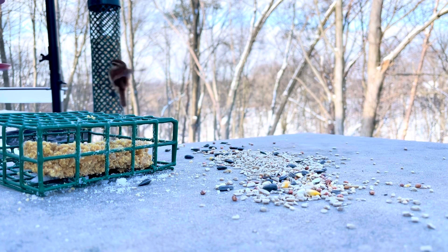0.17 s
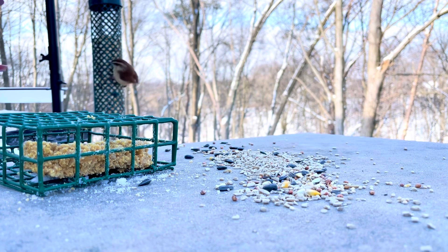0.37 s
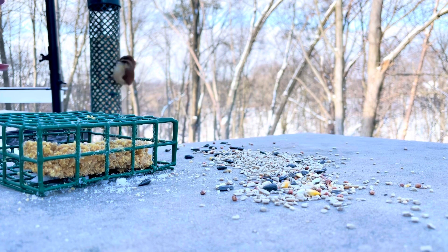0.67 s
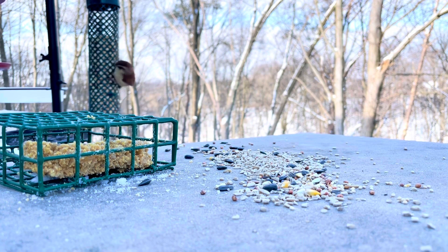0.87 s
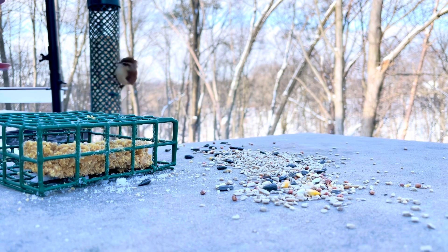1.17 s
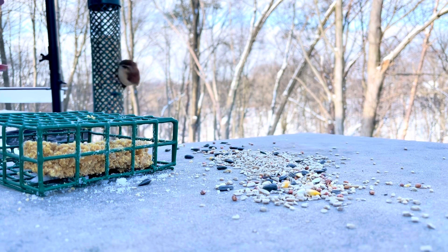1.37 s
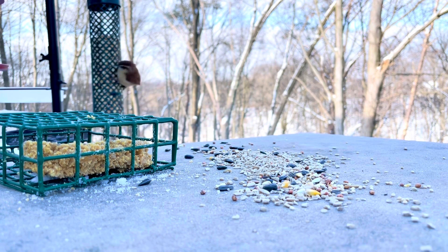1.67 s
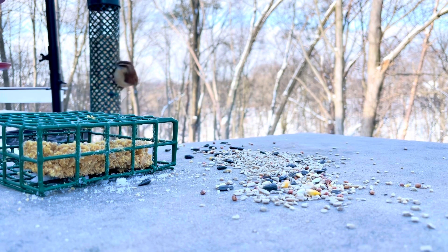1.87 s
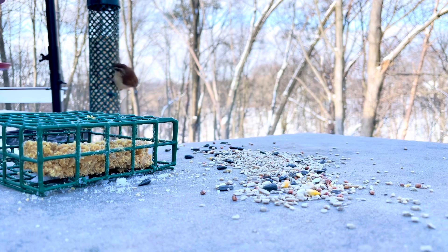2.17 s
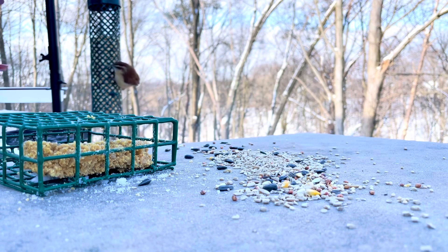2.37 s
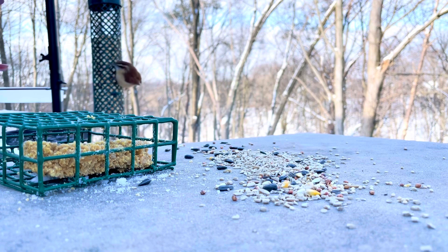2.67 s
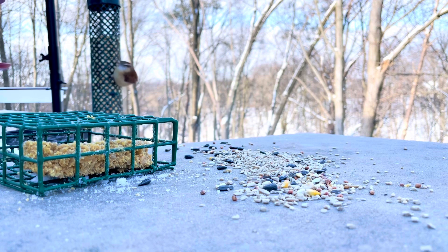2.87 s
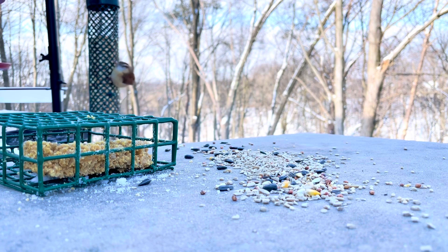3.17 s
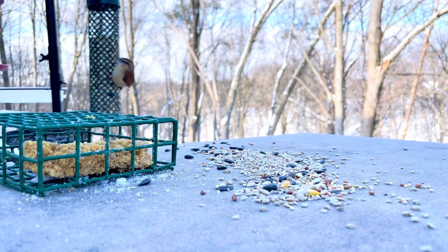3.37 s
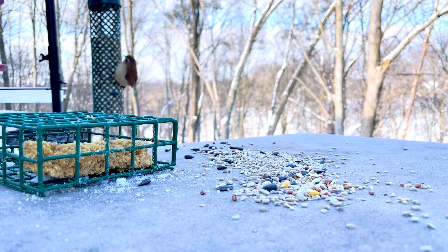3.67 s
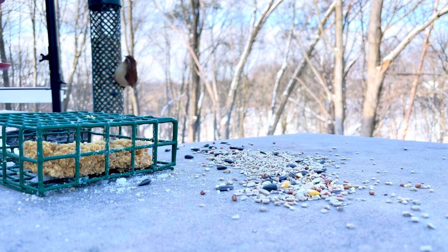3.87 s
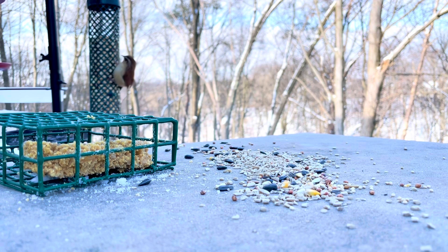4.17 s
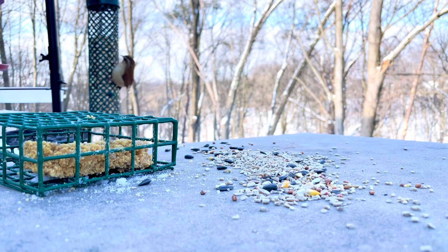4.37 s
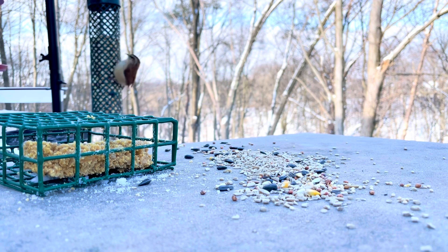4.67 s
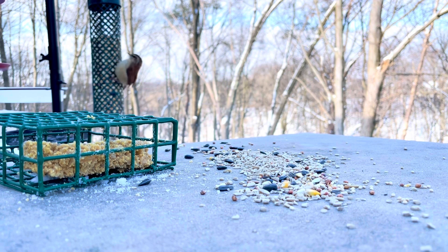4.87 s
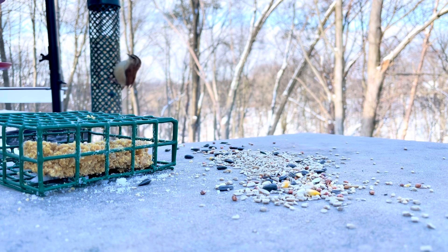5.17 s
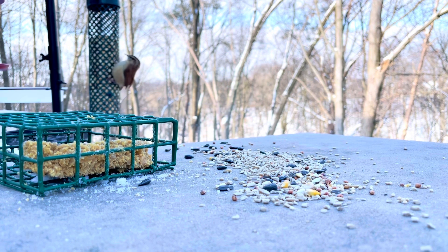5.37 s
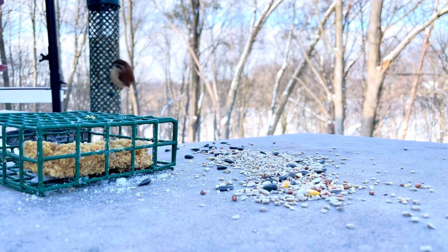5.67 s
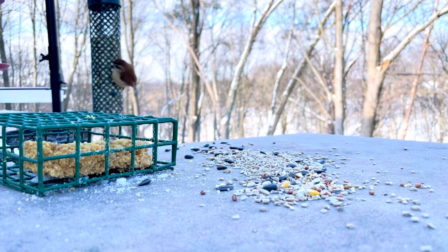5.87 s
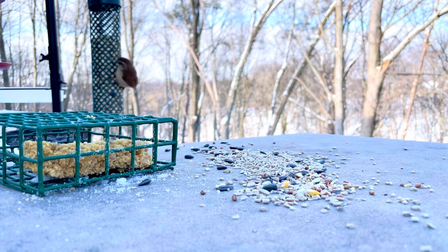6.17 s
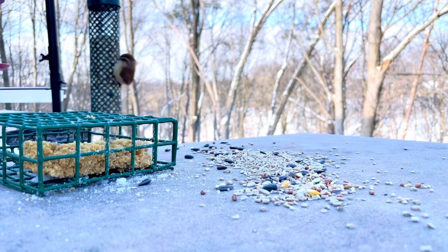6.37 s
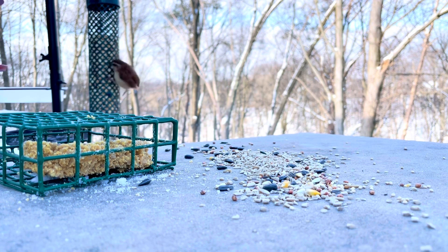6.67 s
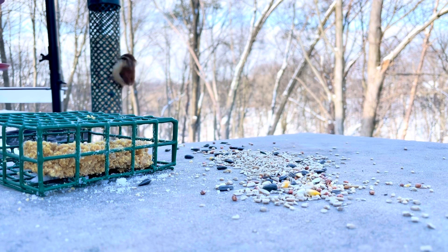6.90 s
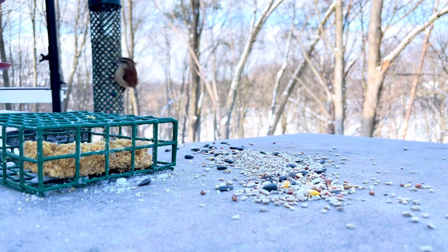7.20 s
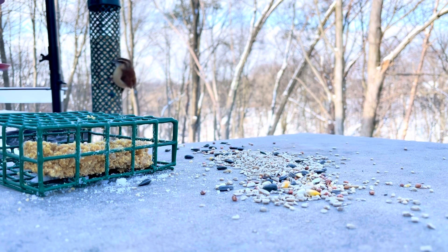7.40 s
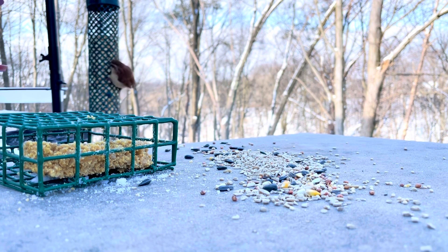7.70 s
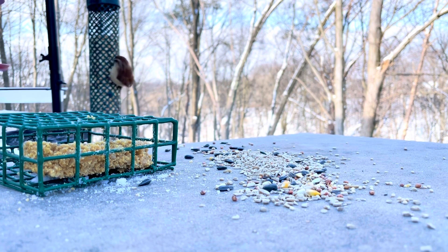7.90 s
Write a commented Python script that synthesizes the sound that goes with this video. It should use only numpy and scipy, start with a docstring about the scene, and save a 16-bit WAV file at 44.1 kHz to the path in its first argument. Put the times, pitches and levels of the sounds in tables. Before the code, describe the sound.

Crisp beak taps and light claw scratches on a metal mesh feeder outdoors, with faint bird calls and wind thudding more strongly near the end.

```python
"""A small bird lands on a wire-mesh feeder in winter woods and pecks at it: runs of tiny clicks ring tube, mesh
and wire. Claws and seeds tick on the wire in the same way, and low thumps are jolts through the feeder's mount
as it lands and settles. Other birds call from the trees: gliding sine tones, most of them with an echo of dying
noise. Gusts of wind buffet a pair of microphone ports (low noise with a moving level). Far traffic drones and
the air hisses: steady noise shaped over frequency."""
import sys
import numpy as np
from scipy import signal
from scipy.fft import rfft, irfft, next_fast_len
from scipy.io import wavfile
from scipy.ndimage import uniform_filter1d

SR = 44100
rng = np.random.default_rng(int(sys.argv[2]) if len(sys.argv) > 2 else 0)


def store_pcm(level_fs):
    """Save levels as 16-bit WAV."""
    pcm = np.round(np.clip(level_fs, -1, 1) * 32767).astype(np.int16)
    wavfile.write(sys.argv[1], SR, np.atleast_2d(pcm).T)


N = 354519  # length in samples


def amp(db):
    """Turn dB into a gain."""
    return 10 ** (np.asarray(db) / 20)


def rms_one(x):
    """Scale to an rms of 1."""
    return x / np.sqrt(np.mean(x ** 2) + 1e-30)


def at_hz(points, hz):
    """Read a table of (f/Hz, value) on a log-frequency axis."""
    p = np.array(points, float)
    return np.interp(np.log(hz + 1), np.log(p[:, 0] + 1), p[:, 1])


def through(x, response):
    """Filter by a function of frequency."""
    size = next_fast_len(N + 8192)
    spectrum = rfft(x, size) * response(np.fft.rfftfreq(size, 1 / SR))
    return irfft(spectrum, size)[..., :N]


def low_pass(x, order, hz):
    """Take away what lies above hz."""
    return signal.sosfilt(signal.butter(order, hz, fs=SR, output="sos"), x)


def high_pass(x, order, hz):
    """Take away what lies below hz."""
    return signal.sosfilt(signal.butter(order, hz, "high", fs=SR, output="sos"), x)


def delayed(x, seconds):
    """Play the same sound later."""
    return np.pad(x, (round(seconds * SR), 0))[:N]


def slow_drift(length, size):
    """Random curve of rms 1, made slow by averaging noise twice."""
    noise = rng.standard_normal(length)
    return rms_one(uniform_filter1d(uniform_filter1d(noise, size), size))


def resonance(x, hz, width_hz):
    """Ring at one pitch: a two-pole resonance with gain 1 on top; a narrow one rings longer."""
    r = np.exp(-np.pi * width_hz / SR)
    feedback = [1, -2 * r * np.cos(2 * np.pi * hz / SR), r * r]
    return signal.lfilter([(1 - r * r) / 2, 0, (r * r - 1) / 2], feedback, x)


# beak on the feeder; each part's level is its energy spread over 10 ms, before echoes and the right port's shading:
# (t/s, tube level/dB, mesh level/dB, thin wire level/dB, contact/ms,
#  then eight values level/dB: how the spot struck favours the modes near SPOT_F)
PECKS = [(0.1104, -51.5, -64, -57.5, 2.24, -9, 4, -3, -2, 5, 0, -2, 5),
         (0.813, -53, -54, -52.5, 3.6, 4, 5, -12, 6, 10, 11, -9, 2),
         (1.0425, -52, -52, -57, 1.66, 8, 5, 15, 7, 0, 12, -5, 2),
         (1.2996, -51, -52.5, -55, 3, 0, 1, 6, -5, 0.5, 7, 7, 13),
         (1.575, -50.5, -52.5, -58, 1.8, 3, -2, 3, -3, -14, 5, 4, 0),
         (3.5561, -75, -82, -88, 3.9, 0, 4, -1, 0, -4, 4, 0, 0),
         (5.602, -90, -87, -70.5, 1.7, 0, 0, 0, 2, 3, 2, -12, -26),
         (6.1526, -56.5, -57, -62, 1.9, 8, 6, 0, -4, -1, -11, 0, 9),
         (6.3984, -59.5, -53.5, -55, 3.9, 4, -2, 3, 0, -2, -3, 7, 6),
         (6.5617, -105.0, -95.0, -81, 2.5, 0, 0, -3, 2, -3, -5, -9, -18),
         (6.6597, -52, -47.5, -52.5, 1.46, 0, -7, -2, -1, -4, -12, 1, 0),
         (6.9354, -51, -54, -53, 2.42, 13, 7, -10, 8, 7.5, -1.5, 1, -6),
         (7.6787, -56, -52, -64.5, 2.9, -10, -1, 1, -1.5, 3, -10, 9, 15),
         (7.9964, -50.5, -53.5, -58, 1.93, 9, 3, -1, 10, 14, -17, -5, 2)]


def pecks():
    """The beak presses on, with one firm blow among the grains; its hold then damps tube and mesh."""
    return feeder(PECKS, grain_db=4.0, onset=0.72, fall=0.86, clump_db=1, blow_db=21, damping=1.25)


# scratches and soft ticks on the feeder, and two short echoes of pecks (0.836 s, 6.968 s); levels as for the beak:
# (t/s, tube level/dB, mesh level/dB, thin wire level/dB, contact/ms, two highest spots: level/dB, level/dB)
SCRATCHES = [(0.088, -77, -82, -80, 14, 0, -6), (0.119, -69, -71, -80, 12, 2, 4),
             (0.132, -75, -80, -80, 15, 2, 4), (0.146, -67, -72, -70, 26, 1, 8),
             (0.19, -64.5, -68, -59, 5, -9, -2), (0.2, -68, -73, -74, 19, 0, 0),
             (0.221, -71, -90, -61, 8.7, -9, 0), (0.2675, -85, -102, -50.5, 5.3, 14, 13),
             (0.3195, -82, -95, -76, 3.4, -8, -8), (0.43, -78, -79, -66, 14, -3, -10),
             (0.836, -66, -74, -85, 1.5, -9, -10), (2.074, -78, -76.5, -69, 4.5, -3, -4),
             (3.562, -95, -92, -84, 20, -10, -20), (4.022, -96.0, -86, -84, 27, -10, -20),
             (5.62, -99.0, -93, -82, 25, -10, -20), (5.873, -90, -82, -70.5, 35, -21, -22),
             (5.908, -92, -87, -80, 52, -10, -20), (5.953, -88, -83, -79, 35, -12, -20),
             (6.004, -93.0, -91, -87, 16, -12, -20), (6.624, -99, -92, -82, 14, -10, -20),
             (6.641, -98.0, -81, -91, 5.7, -10, -20), (6.968, -91, -82, -94, 1.8, -12, -22),
             (7.059, -99.0, -99.0, -82, 6, -11, -20)]


def scratches_and_ticks():
    """Claws catch more abruptly than the beak presses, and slip in clumps of about 2 ms."""
    return feeder(SCRATCHES, grain_db=6.5, onset=0.53, fall=1.0, clump_db=3, blow_db=-1, damping=0.8)


# what each part of the feeder rings with, before the spot struck and the part's level: (f/Hz, width/Hz, level/dB)
TUBE_MODES = [(1356, 410, -9), (1990, 470, -6.5), (2340, 350, -12), (2940, 760, -7.5)]
MESH_MODES = [(3790, 394, 12.5), (4000, 540, 12), (5110, 570, 8.5), (6030, 500, 7.5), (7030, 750, 7),
              (9000, 6200, -8)]
WIRE_MODES = [(10300, 3100, -8.5), (11260, 130, 2), (12660, 960, 3), (13900, 1300, -8.5),
              (15250, 1300, -19)]
# where along the spectrum the spot struck matters: (f/Hz)
SPOT_F = [2420, 2900, 3650, 5100, 6500, 9100, 13900, 15250]
BLOW_AT = .45  # when the blow click lands, as a share of the contact
RATTLE_DB, RATTLE_S = -11, 0.0042  # the wire goes on rattling after the contact
TOP_CUT_HZ = 14300  # clicks of touches with a negative last value are turned down above this
WIRE_FROM_HZ = 7500  # the thin wire radiates little below this
TOUCH_SAMPLES = 4096


def touch_clicks(u, grain_db, clump_db, blow_db):
    """Uneven tiny clicks, up or down at random, one of them set as the blow."""
    clumps = rms_one(uniform_filter1d(rng.standard_normal(TOUCH_SAMPLES), size=90))
    click_db = grain_db * rng.standard_normal(TOUCH_SAMPLES) + clump_db * clumps
    clicks = rng.choice([-1, 1], TOUCH_SAMPLES) * amp(click_db)
    clicks[np.argmax(u > BLOW_AT)] = amp(blow_db)
    return clicks


def ring(modes, push, favoured):
    """One part rings: every mode takes its share of the touch, with alternating sign."""
    rung = 0
    for k, (hz, width_hz, db) in enumerate(modes):
        mode = resonance(resonance(push, hz, width_hz), hz, 9.4 * width_hz)
        # the run of clicks gets the same energy in this mode as the plain click
        mode[0] *= np.sqrt(np.sum(mode[1] ** 2) / np.sum(mode[0] ** 2))
        rung = rung + (-1) ** k * amp(db + at_hz(favoured, hz)) * mode
    return rung


def feeder(touches, grain_db, onset, fall, clump_db, blow_db, damping):
    """Each touch is a run of tiny clicks that sets tube, mesh and wire ringing; row 2 has one plain click a touch."""
    out, t = np.zeros((2, N + TOUCH_SAMPLES)), np.arange(TOUCH_SAMPLES) / SR
    below_top = signal.butter(8, TOP_CUT_HZ, fs=SR, output="sos")
    for s, tube_db, mesh_db, wire_db, contact_ms, *spot_db in touches:
        u = t / (contact_ms / 1000 + 1e-4)  # time in contact lengths
        clicks = touch_clicks(u, grain_db, clump_db, blow_db)
        press = 2 * u ** onset * np.exp(-(2.0 * u) ** fall)
        rattle = amp(RATTLE_DB) * np.minimum(u, 1) * np.exp(-t / RATTLE_S)
        drive = np.array([clicks * (press + rattle), t == 0])
        # a negative last value also turns down the clicks above TOP_CUT_HZ
        body = signal.sosfiltfilt(below_top, drive[0])
        drive[0] = body + amp(min(spot_db[-1], 0)) * (drive[0] - body)
        # a short list of spot values belongs to the highest spots
        spots = zip(SPOT_F[::-1], spot_db[::-1])
        favoured = sorted([(1900, 0), (4300, 0), (11500, 0), *spots])
        damped = drive * np.exp(-damping * np.clip(u - BLOW_AT, 0, 1.5))
        thin = high_pass(drive, 3, WIRE_FROM_HZ)
        at = round(s * SR)
        for modes, db, push in ((TUBE_MODES, tube_db, damped), (MESH_MODES, mesh_db, damped),
                                (WIRE_MODES, wire_db, thin)):
            rung = ring(modes, push, favoured)
            energy = np.sum(rung ** 2, axis=1, keepdims=True) / (.01 * SR)
            out[:, at:at + TOUCH_SAMPLES] += amp(db) * rung / np.sqrt(energy)
    return out[:, :N]


# left minus right from the feeder's side: (f/Hz, level/dB)
FEEDER_BALANCE = [(1000, 0), (1700, 3), (2400, 7), (3100, 15), (3600, 18), (4100, 12), (5100, 4), (5800, 0),
                  (7600, 3), (9000, 1), (12000, 0)]
# how far left leads right: (f/Hz, phase/rad)
FEEDER_LEAD = [(300, 0), (1400, 1.5), (2600, 2.4), (3400, 2.3), (3800, 5.5), (4800, 6.1), (5900, 4.9),
               (6900, 5.4), (7900, 3.9), (8600, 3.1), (10300, 2), (12400, .8), (13500, .2)]


def from_the_feeder(x):
    """The feeder faces the left port; the right one is shadowed, with its own level and phase."""
    def shadow(hz):
        return amp(-at_hz(FEEDER_BALANCE, hz)) * np.exp(-1j * at_hz(FEEDER_LEAD, hz))
    return np.array([x, through(x, shadow)])


# echoes from nearby hard surfaces, as at the left port before dulling: (delay t/s, level/dB)
REFLECTIONS = [(.0107, -25), (.0218, -43), (0.032, -40), (.0563, -36)]


def reflected(x):
    """A few dull single echoes, nearer the left port."""
    late = sum(amp(db) * delayed(x, s) for s, db in REFLECTIONS)
    return low_pass(late, 4, 7600.0) * amp([[0], [-4.0]])


# how alike scattered sound is at the two ports, clipped to -1..1; opposite in phase near 9 kHz: (f/Hz, likeness)
SCATTER_LIKENESS = [(1500, 1), (3000, -0.2), (5000, 0.23), (7300, -0.24), (8200, -0.69), (9400, -1.2),
                    (10500, 1), (12500, 0.42)]


def echoes(x, t60, gap_s):
    """Scatter from many surfaces: dying noise of unit energy that swells in over a gap, partly alike at the ports."""
    t = np.arange(SR) / SR
    tail = rng.standard_normal((2, SR)) * amp(-60 * t / t60) * np.clip(t / gap_s, 0, 1) ** 2
    tail = tail / np.sqrt(np.sum(tail ** 2, axis=1, keepdims=True))
    wet = signal.fftconvolve(x[None], tail, axes=1)[:, :N]

    def share(hz):
        return np.sqrt(.5 + np.clip(at_hz(SCATTER_LIKENESS, hz), -1, 1) * [[.5], [-.5]])
    mid, side = through(wet, share)
    return np.array([mid + side, mid - side])


NEAR_ECHO_DB, NEAR_T60_S, NEAR_GAP_S = -17.5, 0.22, 0.0039


def bird_on_feeder():
    """Pecks, scratches and ticks heard directly, off hard surfaces and as scattered sound."""
    touches, plain = pecks() + scratches_and_ticks()
    plain = low_pass(plain, 8, 14000.0)  # the air dulls the scattered sound
    scattered = amp(NEAR_ECHO_DB) * echoes(plain, NEAR_T60_S, NEAR_GAP_S)
    return from_the_feeder(touches) + reflected(touches) + scattered


# low thumps as the bird lands and settles: (t/s, peak level/dB before the bass cut, f/Hz)
THUMPS = [(.005, -50, 56.3), (0.072, -46, 69.6), (0.113, -38, 95), (.18, -39, 150), (0.196, -40.5, 129),
          (.227, -40.5, 80), (.255, -42, 75), (6.153, -37, 60)]


def thumps():
    """Each is one low jolt through the mount with a dip on both sides, alike at the two ports."""
    s, db, hz = np.transpose(THUMPS)[:, :, None]
    t = np.arange(-2000, 2000) / SR
    bend = (np.pi * hz * t) ** 2
    shapes = amp(db) * (1 - 2 * bend) * np.exp(-bend)
    out = np.zeros(N + 4000)
    for at, shape in zip((s[:, 0] * SR).astype(int), shapes):
        out[at:at + 4000] += shape
    return out[2000:N + 2000]


LOUD_CALL_DB = -60  # calls softer than this lose their overtone


def call(rows, spread_hz, overtone_db, flutter_db=0):
    """A sine gliding along rows of (t/s, f/Hz, level/dB); a random wobble of pitch makes it buzz."""
    s, hz, db = np.transpose(rows)
    t = np.arange(s[0], s[-1], 1 / SR)
    wobble = rms_one(uniform_filter1d(rng.standard_normal(len(t)), size=60))
    phase = 2 * np.pi * np.cumsum(np.interp(t, s, hz) + spread_hz * wobble) / SR
    edges = np.clip(np.minimum(t - s[0], s[-1] - t) / 0.0026, 0, 1)
    flutter = amp(flutter_db * slow_drift(len(t), 500))
    level_db = np.interp(t, s, db)
    # the overtone weakens faster than the note where the call is soft
    second_db = overtone_db + min(max(db) - LOUD_CALL_DB, 0) * 10 + level_db - max(db)
    tone = np.sin(phase) + amp(second_db) * np.sin(2 * phase)
    note = np.sqrt(2) * amp(level_db) * edges * flutter * tone
    return np.pad(note, (round(s[0] * SR), N))[:N]


CHIP_START_DB, CHIP_BEND_DB, CHIP_END_DB = -16, -5, -8  # against the chip's level
CHIP_DROP_HZ, CHIP_DROP_S, CHIP_BEND_HZ, CHIP_FLICK_S = 935, 0.0055, 260, .005


def chip(s, hz, db, length, flick_hz):
    """Rows of one chip: it starts high, bends down to its pitch and ends with a falling flick."""
    return [(s, hz + CHIP_DROP_HZ, db + CHIP_START_DB),
            (s + CHIP_DROP_S, hz + CHIP_BEND_HZ, db + CHIP_BEND_DB),
            (s + 2.3 * CHIP_DROP_S, hz + 27.0, db - 1.0),
            (s + length - CHIP_FLICK_S, hz, db),
            (s + length, hz - flick_hz, db + CHIP_END_DB)]


# high chips from the trees, level before placing left and right:
# (t/s, settled f/Hz, level/dB, length/s, last falling flick f/Hz, level sent to the echo/dB)
CHIPS = [(0.711, 7350, -63.5, 0.028, 20, -16), (3.887, 7370, -68.5, 0.023, 20, -3),
         (4.346, 6970, -59.5, 0.028, 770, 0)]


def high_chips():
    """Short bright sine glides with an overtone: the dry chips, and what they send to the echo."""
    chips = np.array([call(chip(*row[:5]), 60.0, -22) for row in CHIPS])
    return chips.sum(axis=0), amp(np.array(CHIPS)[:, 5]) @ chips


WHISTLE_FADE_S, WHISTLE_EDGE_DB = 0.018, -8.5


def whistle(s, length, first_hz, last_hz, drop_hz, db, swell):
    """Rows of a glide that swells and fades; its early part may drop ahead of the even slope."""
    at = np.array([0, swell, max(length - WHISTLE_FADE_S, swell), length])
    slope_hz = first_hz + (last_hz - first_hz) * at / length
    hz = slope_hz - drop_hz * (at > 0) * (1 - at / length)
    return np.transpose([s + at, hz, db + WHISTLE_EDGE_DB * np.array([2.2, 0.19, 0.046, 0.64])])


# low whistles, most of them falling, level before edges, flutter and placing:
# (t/s, length/s, first f/Hz, last f/Hz, early drop f/Hz, level/dB, swell/s)
LOW_WHISTLES = [(.89, 0.088, 2900, 2650, 7, -90, .022), (2.776, 0.18, 2940, 2455, 289, -85, 0.063),
                (3.06, 0.07, 2390, 2470, -3, -90, 0.021), (7.812, 0.24, 2950, 2100, -110, -86.5, .025)]


def low_whistles():
    """Far, almost pure sine glides that waver in pitch (35 Hz) and level (3.5 dB)."""
    return sum(call(whistle(*row), 35, -60, 3.5) for row in LOW_WHISTLES)


# two notes of a mostly rising buzzy phrase, one list a note: (t/s into the phrase, centre f/Hz, level/dB against the note)
BUZZ_NOTES = [
    [(0, 7560, -8), (.1, 8260, -5), (.18, 8840, -6), (.23, 9530, -4), (.35, 9870, -22)],
    [(.28, 7300, -1), (.35, 7900, 2.5), (.46, 8260, -2.5), (.53, 8550, -9), (.6, 8450, -16)],
]
# when the phrase is sung, levels before flutter and placing: (t/s, first note level/dB, second note level/dB)
BUZZ_PHRASES = [(2.45, -88, -87.5), (5.17, -89.5, -91)]


def buzzy_phrases():
    """Far-off gliding sines whose fast random pitch wobble (220 Hz) is heard as a buzz."""
    total = 0
    for s, *levels_db in BUZZ_PHRASES:
        for note, db in zip(BUZZ_NOTES, levels_db):
            total = total + call(np.add(note, (s, 0, db)), 220, -60, 3)
    return total


# a short near call, level before placing: (t/s, f/Hz, level/dB)
NEAR_TICK = [(2.614, 4950, -92), (2.62, 4920, -86.5), (2.638, 4900, -95)]


def near_tick():
    """One faint wobbling sine, dry and stronger on the left."""
    return call(NEAR_TICK, 170, -60, 0) * amp([[2.0], [-2.0]])


WOODS_DB, WOODS_T60_S, WOODS_GAP_S, WOODS_CUT_HZ = 2, 0.42, 0.0047, 9200
WHISTLE_ECHO_DB = -7  # the low whistles come more directly
TRUNK_ECHO_S, TRUNK_ECHO_DB = 0.027, -14  # one near tree throws the chips back
TREES_LAG_S = .00006  # calls reach the right port first


def birds():
    """All calls from the trees, with the long, dull echo of the woods; one tick is near and dry."""
    chips, sent = high_chips()
    whistles, buzzes = low_whistles(), buzzy_phrases()
    trunk = low_pass(amp(TRUNK_ECHO_DB) * delayed(sent, TRUNK_ECHO_S), 4, WOODS_CUT_HZ)

    def lag(hz):
        return np.exp(-1j * np.pi * hz * TREES_LAG_S * np.array([[1], [-1]]))
    direct = through(chips + trunk + whistles + buzzes, lag) * amp([[1.5], [-1.5]])
    dull = low_pass(sent + amp(WHISTLE_ECHO_DB) * whistles + buzzes, 4, WOODS_CUT_HZ)
    woods = amp(WOODS_DB) * echoes(dull, WOODS_T60_S, WOODS_GAP_S)
    return direct + woods + near_tick()


WIND_LIKENESS, WIND_EVENNESS = 0.56, 0.37  # share alike at both ports; how far swings are evened out


def buffet(hz, width_hz):
    """Eddies at the ports: low noise, partly alike, with its own swings of level partly evened out."""
    both, own = rng.standard_normal(N), rng.standard_normal((2, N))
    x = np.sqrt(WIND_LIKENESS) * both + np.sqrt(1 - WIND_LIKENESS) * own
    x = resonance(resonance(x, hz, width_hz), hz, width_hz)
    level = np.sqrt(uniform_filter1d(rms_one(x) ** 2, size=1500, axis=1) + 0.019)
    return rms_one(low_pass(x, 2, 500) / level ** WIND_EVENNESS)


# gusts that hit the ports, added to the breeze:
# (t/s of arrival, lasts/s, thud level/dB, flap level/dB, left minus right level/dB)
GUSTS = [(0, 0.0086, -47, -63, -1), (0.217, 0.011, -54, -61, -5), (0.802, 0.023, -67, -56, 2),
         (3.085, 0.094, -62, -57, 5), (3.242, 0.015, -44.5, -50, -2), (3.39, 0.017, -55, -62, 1),
         (3.515, 0.033, -54.5, -63, 2), (3.623, 0.033, -49, -62, 1), (3.765, 0.017, -62, -53, -8),
         (4.83, 0.015, -60, -59, -3), (6.135, 0.029, -53, -50.5, -4), (6.7, 0.062, -41, -44, -1.5),
         (7.039, 0.027, -44, -44, -1), (7.166, 0.0096, -55, -51, 4), (7.206, 0.028, -39, -39, -2),
         (7.257, 0.019, -46.5, -43.5, 0.5), (7.35, 0.023, -40.5, -51, -2.5), (7.558, 0.011, -35, -41, 0.5),
         (7.624, 0.045, -52, -45.5, -1), (7.745, 0.0093, -47, -49, 0), (7.769, 0.0081, -36.5, -38.5, -2.5),
         (7.85, 0.068, -50, -53, -5), (7.99, 0.019, -48, -56, -3.5)]
GUST_RISE_DB_PER_S, GUST_FALL_DB_PER_S = 353.5, 260
# wind between the gusts, before lumps and sway: (t/s, thud level/dB)
BREEZE = [(0, -57.5), (.4, -65), (1.2, -59), (2.2, -59), (2.9, -60.5), (3.5, -63.5), (4.5, -55),
          (5.5, -66.5), (6.4, -56), (7, -51), (8.04, -58)]
BREEZE_FLAP_DB, BREEZE_LUMPS_DB, BREEZE_SWAY_DB, LUMP_S = -7.5, 3.5, 1.5, 0.078  # flap is against the thud


def wind():
    """A deep thud and a brighter flap: a lumpy breeze, and gusts that rise, last and fall away."""
    t, sides = np.arange(N) / SR, np.array([[.5], [-.5]])
    lumps, flap_lumps, sway = (slow_drift(N, int(LUMP_S * SR)) for _ in range(3))
    breeze_db = np.interp(t, *np.transpose(BREEZE)) + BREEZE_SWAY_DB * sway * sides
    thud = amp(breeze_db + BREEZE_LUMPS_DB * lumps)
    flap = amp(breeze_db + BREEZE_FLAP_DB + BREEZE_LUMPS_DB * flap_lumps)
    for s, lasts, thud_db, flap_db, left_db in GUSTS:
        near = slice(max(int((s - .3) * SR), 0), int((s + lasts + .4) * SR))
        before = np.maximum(s - t[near], 0)
        after = np.maximum(t[near] - s - lasts, 0)
        loss_db = GUST_RISE_DB_PER_S * before + GUST_FALL_DB_PER_S * after
        thud[:, near] += amp(thud_db - loss_db + left_db * sides)
        flap[:, near] += amp(flap_db - loss_db + left_db * sides)
    return thud * buffet(48.0, 42.0) + flap * buffet(78.5, 60.0)


def steady(shared, shared_db, differing, differing_db):
    """Steady noise: a shared part plus and minus a differing part, each shaped and then set in level."""
    a, b = rng.standard_normal((2, N))
    mid = amp(shared_db) * rms_one(through(a, lambda hz: amp(at_hz(shared, hz))))
    side = amp(differing_db) * rms_one(through(b, lambda hz: amp(at_hz(differing, hz))))
    return np.array([mid + side, mid - side])


# shape of the traffic drone, shared by both ports, then of the part that differs: (f/Hz, relative level/dB per Hz)
TRAFFIC_SHARED = [(15, -38), (43, -20.5), (96, 0), (129, 0.5), (182, -4), (255, -4), (440, -11),
                  (540, -9.5), (870, -8), (1500, -21.5), (1880, -30), (2150, -40.5), (2500, -50),
                  (3500, -95)]
TRAFFIC_DIFFERING = [(15, -43.5), (60, -13), (150, -5), (300, -8.5), (570, -6.5), (900, -6), (1500, -19.5),
                     (1880, -28.5), (2150, -41), (2500, -51), (3500, -84)]


def traffic():
    """Far traffic: a steady low drone, a little to the left."""
    return steady(TRAFFIC_SHARED, -51.5, TRAFFIC_DIFFERING, -55.5) * amp([[.75], [-.75]])


# shape of the air hiss, shared by both ports, then of the part that differs: (f/Hz, relative level/dB per Hz)
HISS_SHARED = [(2000, -10.5), (2600, 1.5), (3300, -0.5), (4050, -1.5), (4250, 2.5), (4450, -3),
               (5000, -2.5), (7300, -5.5), (8000, -19.5), (9500, -21), (10300, -9), (12000, -3.5),
               (13100, -5), (13600, -25.5), (16300, -29)]
HISS_DIFFERING = [(2000, -15), (2600, 2), (5000, -2.5), (7000, -4.5), (8500, -0.5), (10500, -2.5),
                  (12400, -10), (13000, -33), (16300, -24)]


def air_hiss():
    """The faint hiss of the air, kept above about 1800 Hz."""
    return high_pass(steady(HISS_SHARED, -91, HISS_DIFFERING, -91), 4, 1800.0)


def scene():
    """Bird on the feeder, its thumps, birds in the trees, wind, traffic and hiss."""
    return bird_on_feeder() + thumps() + birds() + wind() + traffic() + air_hiss()


def record(dry):
    """The deepest bass is rolled off and the top is cut."""
    dry = high_pass(dry, 2, 30.0)
    return signal.sosfilt(signal.cheby2(14, 70, 16700, fs=SR, output="sos"), dry)


dry = scene()
out = record(dry)
store_pcm(out)
```